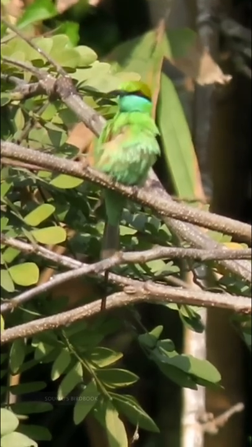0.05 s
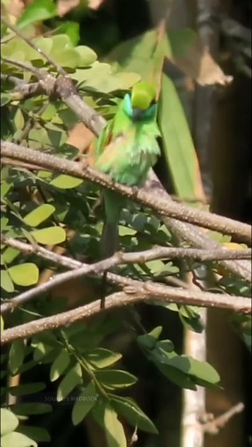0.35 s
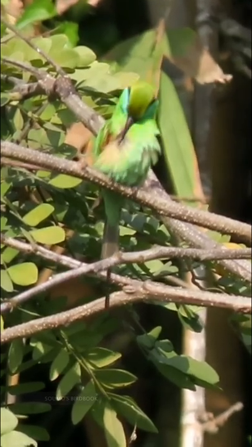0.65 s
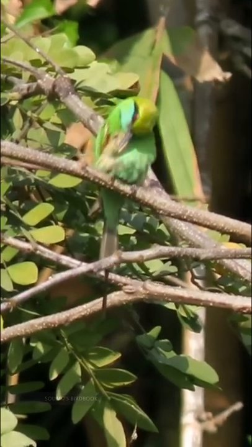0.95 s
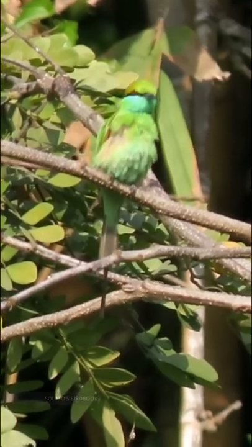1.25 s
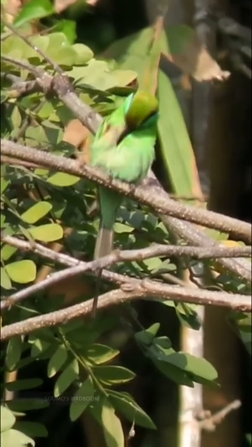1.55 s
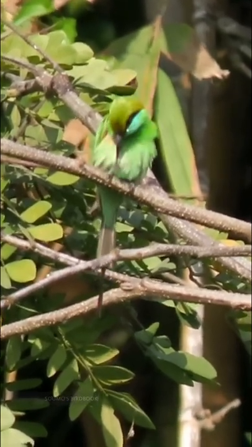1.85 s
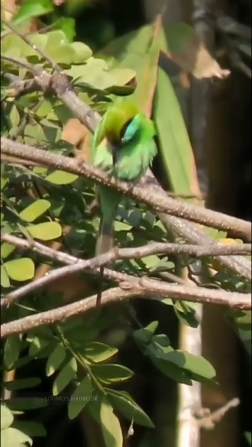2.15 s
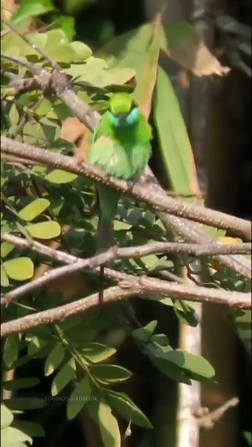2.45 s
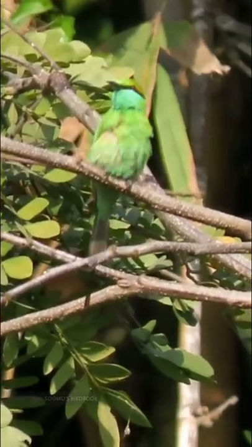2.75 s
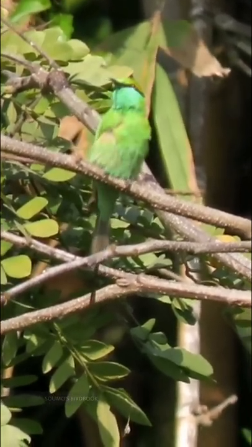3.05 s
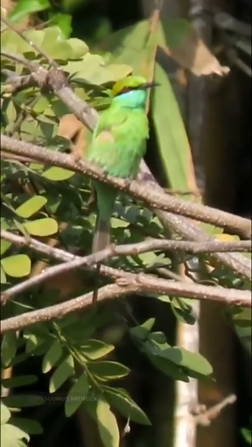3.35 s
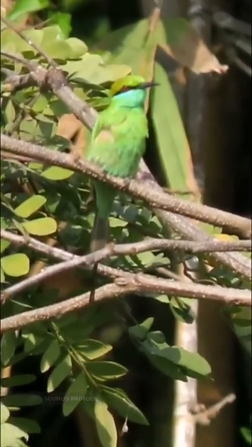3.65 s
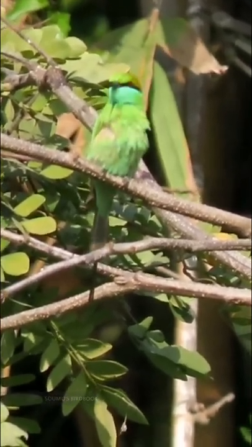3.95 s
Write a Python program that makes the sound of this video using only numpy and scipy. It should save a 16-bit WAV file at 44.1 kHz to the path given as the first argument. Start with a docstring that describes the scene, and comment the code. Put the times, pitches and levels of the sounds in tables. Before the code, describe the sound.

A bird gives short, nasal calls that rise and fall in pitch, at about 0.1 and 0.4 seconds, then again at 1.8 and 2.1, each with a brief ringing echo from trees. Distant small birds tick faintly throughout and twitter from about 1 to 3.6 seconds. A few soft, dull bumps come mostly between 2.2 and 3.1 seconds. A steady low rumble and soft hiss continue underneath.

```python
"""Nasal bird calls among trees

A bird gives two pairs of short, arched calls: a harmonic voice gliding through throat resonances.
A trunk throws back a clear echo and the foliage a ringing tail. Farther off, small birds tick,
pip and twitter over a few dull bumps, a steady low rumble and a soft outdoor hiss."""
import sys
import numpy as np
from scipy import signal
from scipy.fft import rfft, irfft
from scipy.io import wavfile
from scipy.ndimage import uniform_filter1d

SR = 44100
rng = np.random.default_rng(int(sys.argv[2]) if len(sys.argv) > 2 else 0)


def bounce(signal):
    """Save signal as a 16-bit WAV file at the path given by the first command-line argument."""
    frames = np.transpose(np.atleast_2d(signal))
    limited = np.clip(frames, -1, 1)
    pcm = np.round(limited * 32767).astype(np.int16)
    wavfile.write(sys.argv[1], SR, pcm)


N = 176400

# pitch contour, one list per call: t/s, f/Hz
CALL_PITCH_HZ = [
    [(.117, 995), (.131, 940), (.152, 1092), (.175, 1145), (.198, 1172), (.211, 1150), (.223, 1071),
     (.236, 912)],
    [(.41, 874), (.424, 918), (.44, 905.3), (.457, 916), (.472, 916.3), (.483, 888), (.502, 837)],
    [(1.757, 1049), (1.768, 931), (1.79, 1119), (1.812, 1156), (1.838, 1202), (1.862, 1205), (1.873, 1110),
     (1.886, 850)],
    [(2.116, 923), (2.131, 865), (2.16, 921), (2.183, 969), (2.197, 1030), (2.213, 1041), (2.235, 988),
     (2.259, 821)],
]
# per call, all level/dB: base, overtones, top, tail, scratch, direct 3rd harmonic, reflected 3rd, echo
CALL_LEVELS_DB = [(-38.5, -1.5, 7.5, 3, -55, -3, 3.5, 1), (-39, 2, 0, 1, -46, 0, 3.5, -13),
                  (-37.5, 2, -1.5, 2, -52, -5, -3, 8), (-39, 2.5, -2, 0, -56, 3, -3.5, 4)]
# throat and beak resonances: f/Hz, level/dB
THROAT_DB = [(880, -5), (1170, 0), (1750, -8), (2100, -2), (2380, -3), (2700, -19.5), (3100, -18.5),
             (3480, -20.5), (3660, -5.5), (4100, -8), (4700, -11), (5150, -12.5), (5500, -31.5),
             (6000, -23), (6400, -23), (7200, -16.5), (8100, -33), (9300, -22), (10300, -58)]
# colour of the calls' tail: f/Hz, level/dB
SCATTER_DB = [(900, -8.5), (1200, -5.5), (1800, -4.5), (2300, -10), (2800, -0.5), (3200, 13.5), (3500, 10),
              (3700, 0), (4100, 2), (4700, -4.5), (5300, -4), (6000, -3), (7200, -10.5), (9500, -5.5)]
# blurred echoes off tree clumps: delay/s, swell/dB
CLUMP_ECHOES = [(0.079, 0.5), (.18, 1)]


def calling_bird():
    """A harmonic voice opens with a scratch and glides through fixed resonances; the trees answer."""
    jitter, rasp_rad, flutter_db = .002, from_db(-27.5), 1.2
    top_from_hz, top_drop_db, tail_drop_db = 5400, 18, 2.5  # drops away from the crest
    dull_db_per_s, dull_last_s = 168, .035  # overtones die first
    direct, to_foliage, to_trunk = np.zeros((3, N))
    for contour, levels in zip(CALL_PITCH_HZ, CALL_LEVELS_DB):
        base_db, overtone_db, top_db, tail_db, scratch_db, third_db, reflected_third_db, echo_db = levels
        times, hz = np.transpose(contour)
        start = times[0]
        t = np.arange(int((times[-1] - start) * SR)) / SR
        pitch = uniform_filter1d(np.interp(t + start, times, hz), size=300)
        pitch *= 1 + jitter * drift(len(t), rate_hz=120)
        phase = 2 * np.pi * np.cumsum(pitch) / SR + rasp_rad * drift(len(t), rate_hz=260)
        envelope = fade(t, attack_s=.018, release_s=.018)
        off_crest = 1 - np.sin(np.pi * (t / t[-1]) ** 1.32)
        opening_db = top_db - top_drop_db * off_crest
        dull_db = dull_db_per_s * np.maximum(t - t[-1] + dull_last_s, 0)
        ahead, around = 0, 0
        for k in range(1, 11):
            db = base_db + at_hz(THROAT_DB, k * pitch) + overtone_db * (k > 2) - dull_db * (k > 3)
            db += opening_db * (k * pitch.mean() > top_from_hz)
            db += flutter_db * drift(len(t), rate_hz=50)
            partial = np.sqrt(2) * from_db(db) * np.sin(k * phase) * envelope
            ahead += partial * from_db(third_db * (k == 3))
            around += partial * from_db(reflected_third_db * (k == 3))
        scratch = from_db(scratch_db) * puff(length_s=.028, centre_hz=4200, width_hz=450)
        add(direct, start, ahead)
        add(direct, start - .006, scratch)
        add(to_foliage, start, around * from_db(tail_db - tail_drop_db * off_crest))
        add(to_trunk, start, around * from_db(echo_db))
    tail = foliage(to_foliage, SCATTER_DB, CLUMP_ECHOES, gap_s=.012)
    tail_flutter_db = 2.4 * drift(N, rate_hz=36)
    return direct + trunk_echo(to_trunk) + tail * from_db(tail_flutter_db)


def trunk_echo(x, delay_s=.056, centre_hz=3590, width_hz=270):
    """One trunk returns a clear, narrow-band copy."""
    delayed = np.zeros(N)
    add(delayed, delay_s, x)
    return irfft(rfft(delayed) / (1 + 1j * (bins(N) - centre_hz) / width_hz) ** 2, N)


# foliage decay: f/Hz, t60/s
FOLIAGE_T60_S = [(1000, 0.37), (2200, 0.48), (3200, 1), (3650, 0.9), (4100, 0.45), (4700, 0.67),
                 (9000, 0.52)]


def foliage(x, colour=None, echoes=(), gap_s=0):
    """Dense stereo scatter, dying band by band and swelling at each blurred echo."""
    correlation, build_s, blur_s = .65, .026, .035
    t = np.arange(SR) / SR
    mid, side = rng.standard_normal((2, SR))
    white = rfft(np.sqrt((1 + correlation) / 2) * mid + np.sqrt((1 - correlation) / 2) * side * [[1], [-1]])
    swell_db = sum(db * np.exp(-.5 * ((t - delay_s) / blur_s) ** 2) for delay_s, db in echoes)
    build = 1 - np.exp(-np.maximum(t - gap_s, 0) / build_s)
    band_hz, band_t60_s = np.transpose(FOLIAGE_T60_S)
    response = np.zeros((2, SR))
    for t60_s, one_band in zip(band_t60_s, np.eye(len(band_hz))):
        decay = from_db(swell_db - 60 * t / t60_s) * build
        band_gain = at_hz(np.c_[band_hz, one_band], bins(SR))
        response += irfft(white * band_gain) * decay / np.sqrt(np.sum(decay ** 2))
    size = N + SR
    colour_gain = 1 if colour is None else from_db(at_hz(colour, bins(size)))
    return irfft(rfft(x, size) * rfft(response, size) * colour_gain, size)[:, :N]


# one small bird's ticks: t/s, level/dB
TICK_NOTES = [(.046, -57.5), (.124, -52), (.295, -56), (.744, -53.5), (.956, -54), (1.162, -53),
              (1.391, -52), (1.616, -53), (1.785, -52), (2.08, -55.5), (2.125, -49), (2.302, -53),
              (2.545, -57), (2.775, -56.5), (3.039, -55), (3.28, -56), (3.422, -52.5), (3.52, -57),
              (3.736, -54), (3.972, -56)]
# other birds' pips and twitters: t/s, length/s, start f/Hz, end f/Hz, level/dB
CHIRP_NOTES = [(1.063, 0.044, 3090, 3330, -62), (1.152, 0.041, 3610, 3700, -60),
               (1.192, 0.032, 3750, 3520, -60.5), (1.427, 0.014, 3220, 3560, -51),
               (1.446, 0.025, 3640, 3010, -52), (1.492, 0.035, 3300, 3530, -58),
               (1.526, 0.027, 2970, 2480, -53.5), (1.562, 0.035, 2620, 2696, -50.5),
               (1.661, 0.017, 3310, 4300, -54), (1.686, 0.015, 3920, 3000, -55),
               (1.707, 0.014, 3110, 4030, -54), (1.818, .036, 3600, 2740, -48.5),
               (2.332, 0.043, 2640, 2830, -50), (2.556, 0.031, 2710, 2827, -49),
               (2.776, 0.03, 2630, 2934, -51), (3.006, 0.033, 2600, 2725, -53.5),
               (3.268, 0.021, 2630, 2780, -52), (3.392, 0.055, 2020, 1640, -60),
               (3.455, 0.052, 1660, 1455, -63), (3.515, 0.021, 2690, 2810, -55.5),
               (3.519, 0.068, 1126, 1067, -55.5)]


def small_birds():
    """Distant rough, falling ticks and clearer chirps, blurred by the foliage."""
    tick_fade_db, tick_wet_db, chirp_wet_db = 9.5, -3.5, -4.5
    ticks, chirps = np.zeros((2, N))
    for start, db in TICK_NOTES:
        tick = whistle(length_s=.0209, from_hz=6250, to_hz=5420, edge_s=.002, rough_rad=1.45)
        add(ticks, start, tick * from_db(db - np.linspace(0, tick_fade_db, len(tick))))
    for start, length_s, from_hz, to_hz, db in CHIRP_NOTES:
        add(chirps, start, from_db(db) * whistle(length_s, from_hz, to_hz, edge_s=.0054, rough_rad=.45))
    return ticks + chirps + foliage(from_db(tick_wet_db) * ticks + from_db(chirp_wet_db) * chirps)


def whistle(length_s, from_hz, to_hz, edge_s, rough_rad):
    """One gliding note with a shaky phase."""
    t = np.arange(int(length_s * SR)) / SR
    pitch = np.linspace(from_hz, to_hz, len(t))
    phase = 2 * np.pi * np.cumsum(pitch) / SR + rough_rad * drift(len(t), rate_hz=430)
    return np.sqrt(2) * np.sin(phase) * fade(t, edge_s, edge_s)


# faint bumps: t/s, length/s, centre f/Hz, width/Hz, level/dB
BUMP_BURSTS = [(.385, 0.042, 402, 60, -45), (1.487, 0.027, 444, 92, -46), (2.235, 0.027, 680, 100, -46.5),
               (2.28, .03, 340, 70, -42), (2.653, 0.015, 535, 396, -39), (2.918, 0.1, 415, 202, -42.5),
               (3.04, 0.045, 445, 130, -48.5)]


def bumps():
    """Soft, dull bursts of low noise."""
    track = np.zeros(N)
    for start, length_s, centre_hz, width_hz, db in BUMP_BURSTS:
        add(track, start, from_db(db) * puff(length_s, centre_hz, width_hz))
    return track


# rumble and hiss spectra: f/Hz, relative density/dB
RUMBLE_SHAPE_DB = [(12, -39), (20, -23), (38, -2.5), (82, 0.5), (113, -6), (175, -8.5), (275, -16),
                   (295, -16), (323, -15.5), (489, -17), (597, -23.5), (872, -21), (1030, -26.5),
                   (1500, -34), (1950, -37.5), (3300, -120)]
HISS_SHAPE_DB = [(820, 2), (1400, -12.5), (2120, -5.5), (2400, -8), (2740, -6), (3530, -9), (6250, -16),
                 (6990, -18.5), (10700, -25.5), (14800, -26.5), (15900, -33)]
# stereo width: f/Hz, side minus mid/dB
WIDTH_DB = [(60, -43), (120, -25), (240, -11), (480, -10.5), (950, -11.5), (1890, -3), (3770, -4),
            (7520, -6), (15000, 14)]
# balance: f/Hz, left minus right/dB
BALANCE_DB = [(60, 0.0), (150, 0), (380, 1.5), (950, 1.5), (2380, 0), (5980, 0), (15000, -0.5)]


def background(shape, mid_db, swell_db):
    """Steady, gently swelling noise, wider toward the treble."""
    hz = bins(N)
    in_band = (hz > shape[0][0]) & (hz < shape[-1][0])
    mid, side = rfft(rng.standard_normal((2, N))) * from_db(at_hz(shape, hz)) * in_band
    ears = np.array([[1], [-1]])
    spread = mid + ears * side * from_db(at_hz(WIDTH_DB, hz))
    pair = irfft(spread * from_db(ears * at_hz(BALANCE_DB, hz) / 2), N)
    return pair / irfft(mid, N).std() * from_db(mid_db + swell_db * drift(N, rate_hz=1.3))


def puff(length_s, centre_hz, width_hz):
    """A short burst of band noise."""
    t = np.arange(int(length_s * SR)) / SR
    band = np.exp(-.5 * ((bins(SR) - centre_hz) / width_hz) ** 2)
    noise = irfft(rfft(rng.standard_normal(SR)) * band)
    return rms_one(noise[:len(t)]) * fade(t, length_s / 4, length_s / 2)


def drift(size, rate_hz):
    """Smooth random wander of spread 1."""
    total = SR * (1 + size // SR)
    spectrum = rfft(rng.standard_normal(total)) / (1 + (bins(total) / rate_hz) ** 2)
    return rms_one(irfft(spectrum, total))[:size]


def fade(t, attack_s, release_s):
    """Rounded rise, hold and fall."""
    rise = np.sin(np.pi / 2 * np.clip(t / attack_s, 0, 1))
    fall = np.sin(np.pi / 2 * np.clip((t[-1] - t) / release_s, 0, 1))
    return rise * fall


def from_db(db):
    """Decibels to gain."""
    return 10 ** (np.asarray(db) / 20)


def rms_one(x):
    """Scale to unit rms."""
    return x / np.sqrt(np.mean(x ** 2) + 1e-20)


def at_hz(points, hz):
    """Read a table on a log-frequency axis."""
    f, value = np.transpose(points)
    return np.interp(np.log(np.maximum(hz, 1)), np.log(f), value)


def bins(size):
    """Frequencies of a real spectrum."""
    return np.fft.rfftfreq(size, 1 / SR)


def add(track, start_s, sound):
    """Mix a sound in at a time."""
    i = max(int(start_s * SR), 0)
    track[i:i + len(sound)] += sound[:N - i]


def scene():
    """The birds sit slightly right, so the left ear hears them later and softer."""
    pan_db, left_lag_s = 2, 38e-6
    left, right = calling_bird() + small_birds()
    left = irfft(rfft(left) * np.exp(-2j * np.pi * bins(N) * left_lag_s), N)
    birds = np.array([left * from_db(-pan_db / 2), right * from_db(pan_db / 2)])
    events = birds + bumps()
    rumble = background(RUMBLE_SHAPE_DB, mid_db=-35, swell_db=.6)
    hiss = background(HISS_SHAPE_DB, mid_db=-57, swell_db=.32)
    return events + rumble + hiss


def record(dry):
    """Short fade-in, steep low-pass."""
    fade_in_s, stopband_hz = .003, 16400
    fade_in = np.minimum(np.arange(N) / SR / fade_in_s, 1)
    return signal.sosfilt(signal.cheby2(20, 60, stopband_hz, fs=SR, output="sos"), dry * fade_in)


dry = scene()
out = record(dry)
bounce(out)
```